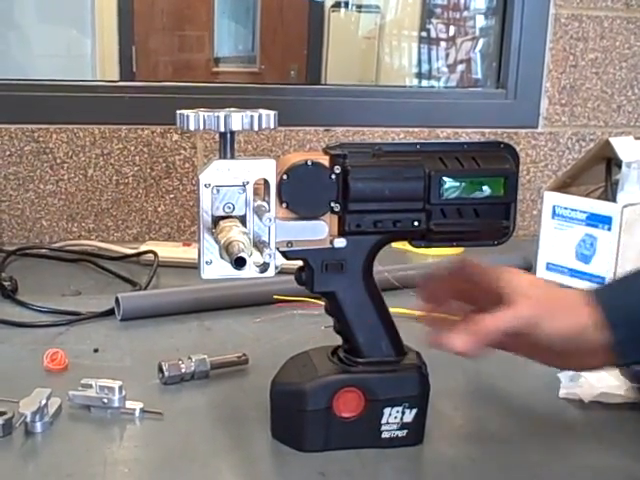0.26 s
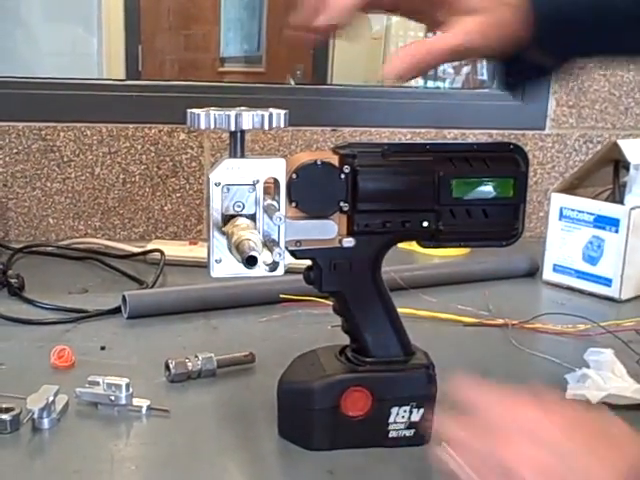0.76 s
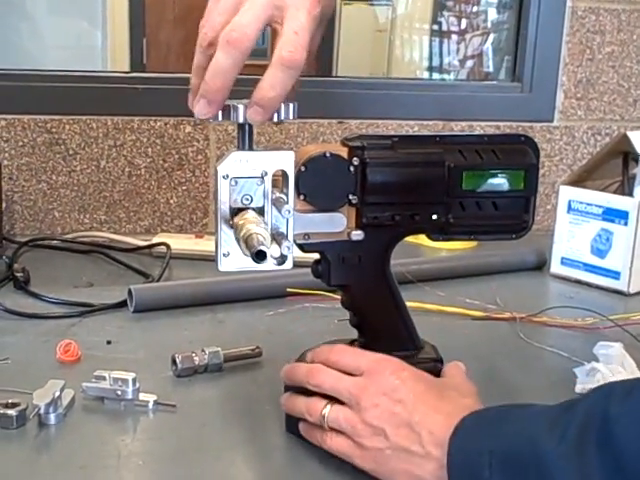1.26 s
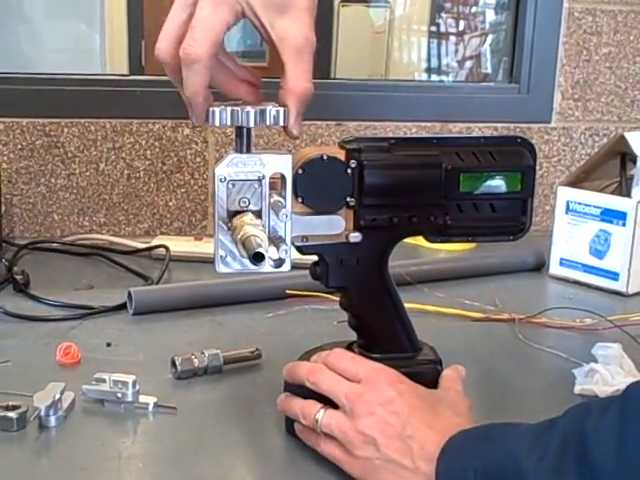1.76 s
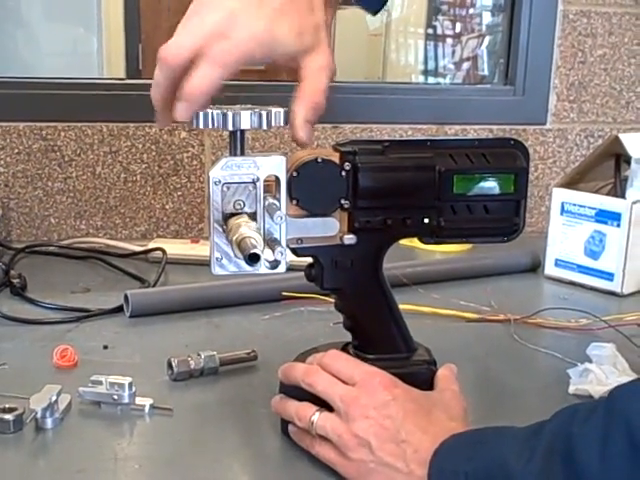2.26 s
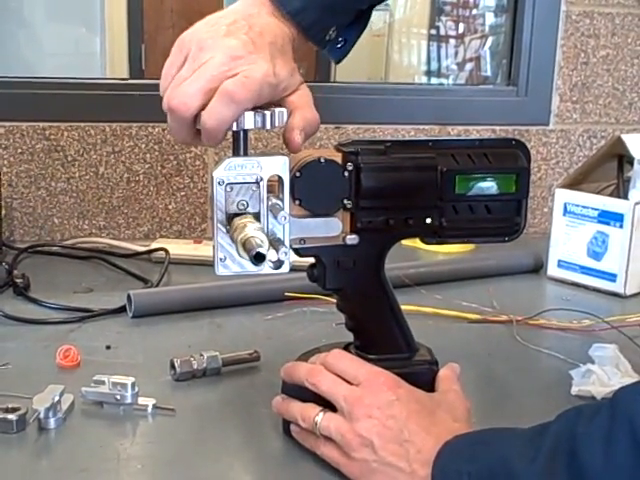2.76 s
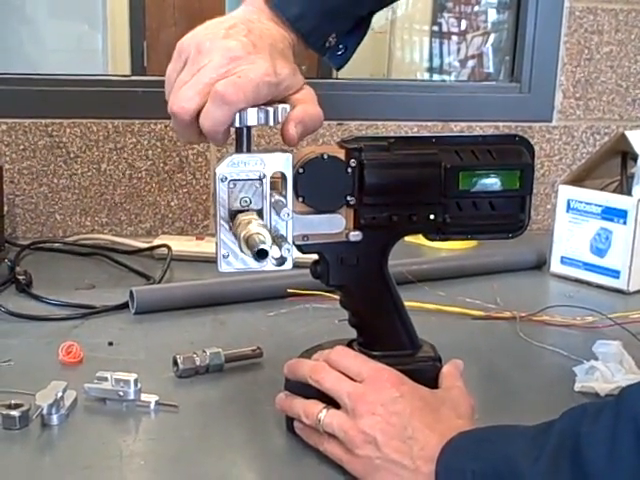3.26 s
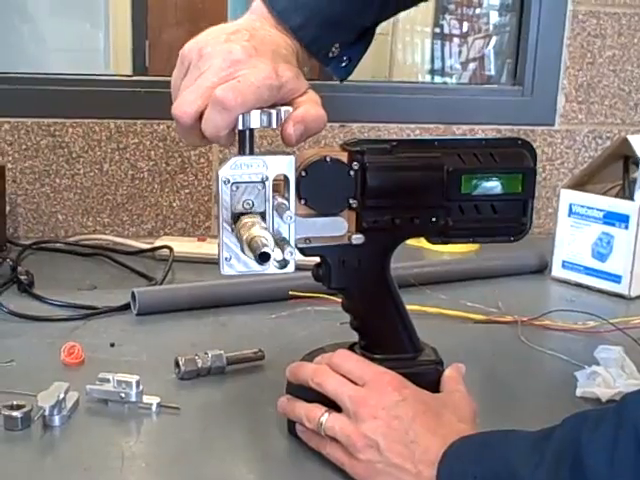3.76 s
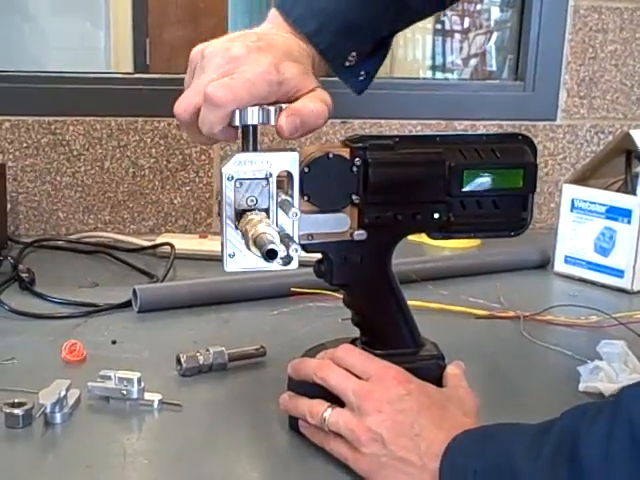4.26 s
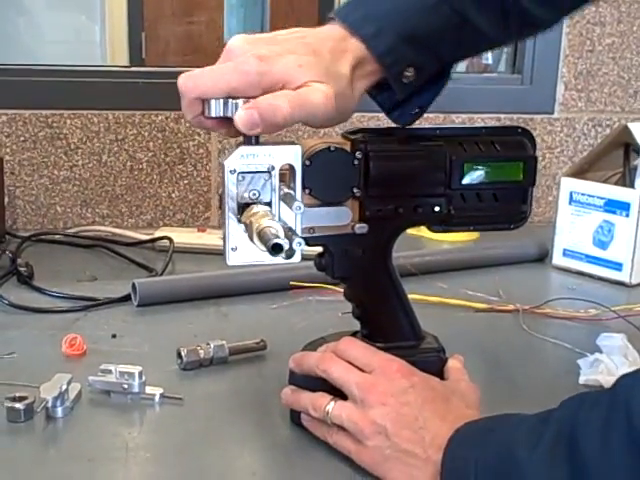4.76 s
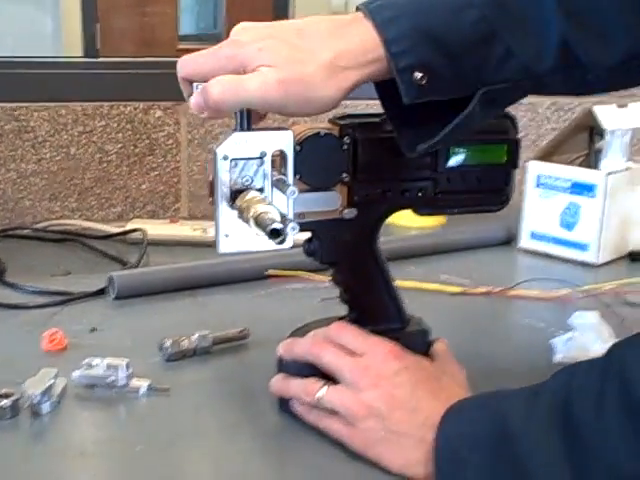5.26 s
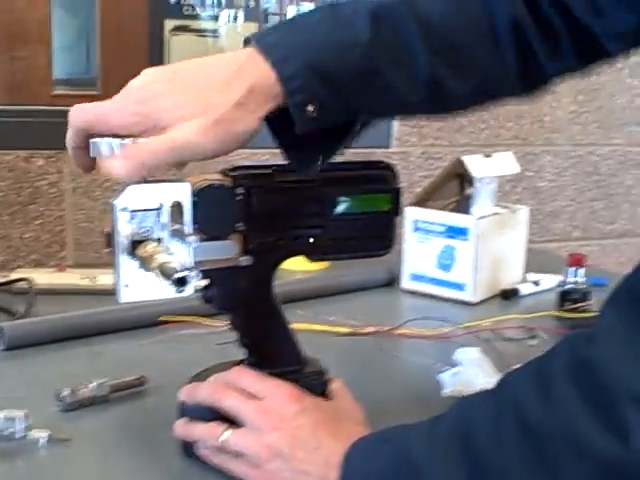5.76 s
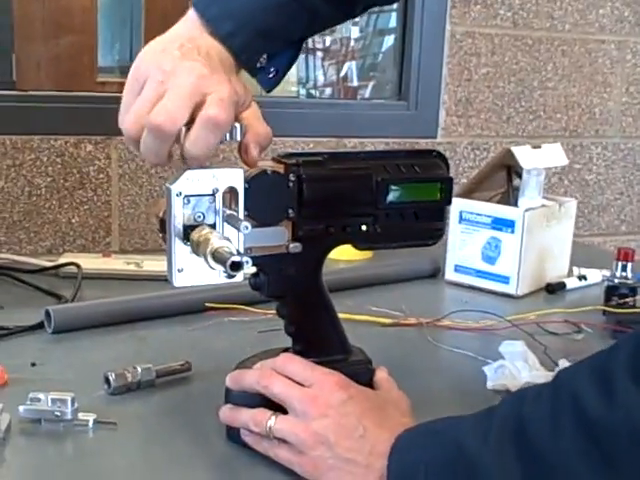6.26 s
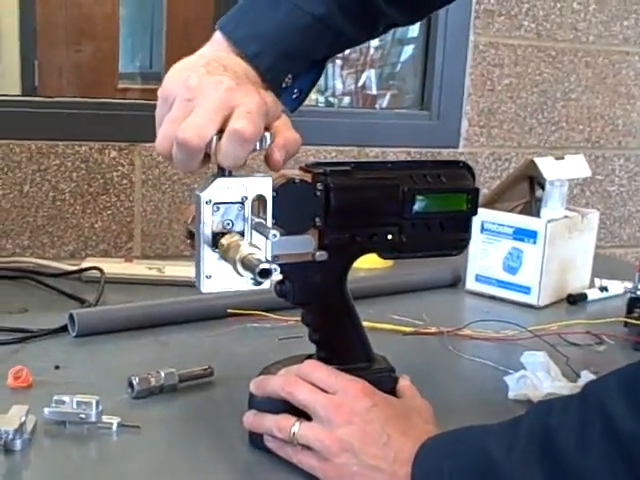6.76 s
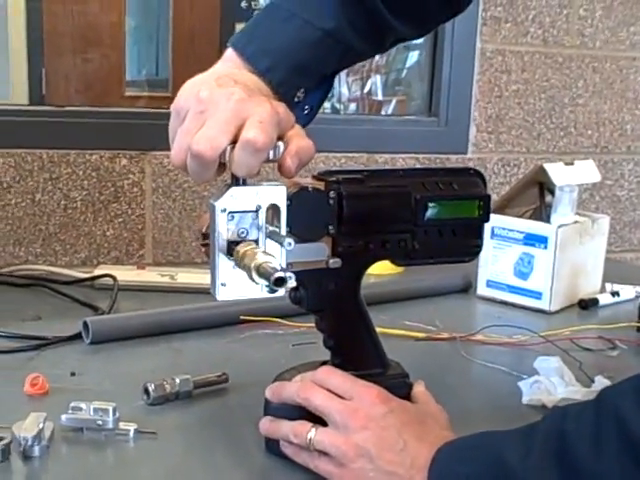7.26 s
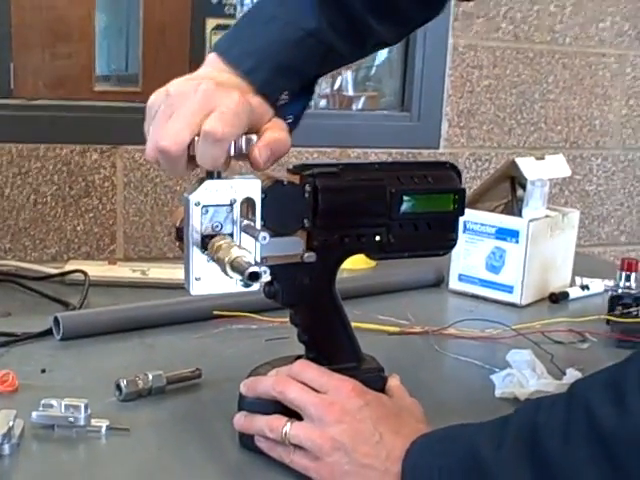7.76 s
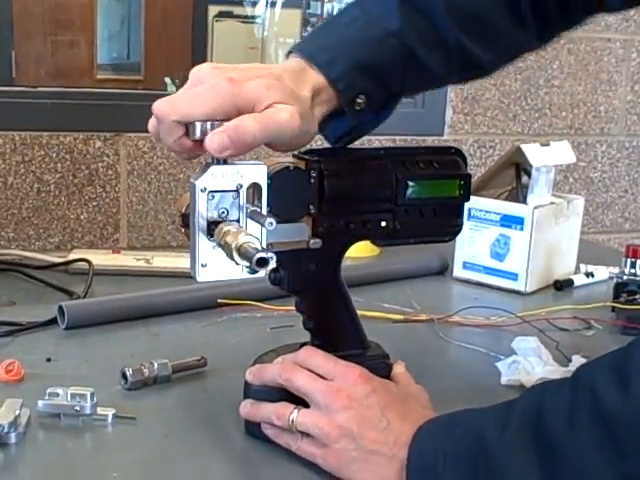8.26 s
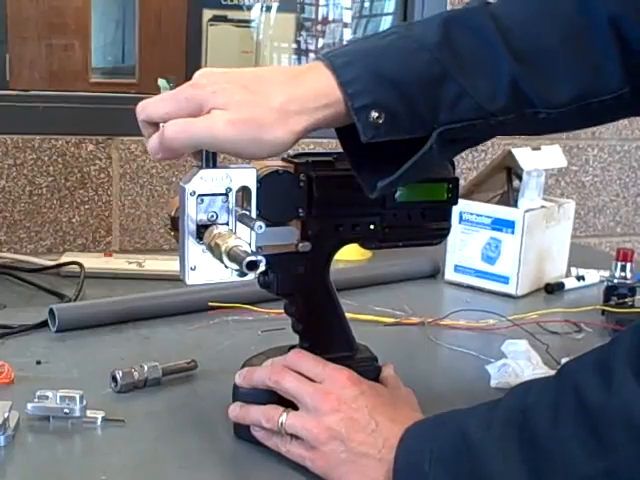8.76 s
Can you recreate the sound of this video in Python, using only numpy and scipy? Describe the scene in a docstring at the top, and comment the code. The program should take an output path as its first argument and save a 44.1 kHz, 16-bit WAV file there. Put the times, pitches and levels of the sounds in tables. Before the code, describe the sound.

A battery-driven tool on a bench, heard close with a short room tail. Its motor sweeps upward beneath a constant, wavering high squeal, then settles in just over a second into a dense, hissy, gear-laden whir. The shrill whine swells and dips. As the cutter is fed in, pitch drops a touch and a fuller hum emerges, continuing to the end.

```python
"""A battery tube cutter soft-starts on a workbench, then runs on while a hand feeds the cutter in.
Its controller sings at the switching rate until fully on. Sines locked to one shaft make the hum, brush tone
and pinion whine; noise makes the gear rattle through housing resonances, the fan rush, a hiss beside the
whine and a rumble on the bench during run-up. Workshop rumble and ventilation hum lie beneath."""
import sys
import numpy as np
from scipy import signal
from scipy.fft import rfft, irfft, next_fast_len
from scipy.io import wavfile
from scipy.ndimage import uniform_filter1d

SR = 44100
rng = np.random.default_rng(int(sys.argv[2]) if len(sys.argv) > 2 else 0)


def store_wav(level_fs):
    """Save 16-bit WAV to argv[1]."""
    pcm = np.round(np.clip(np.atleast_2d(level_fs), -1, 1) * 32767)
    wavfile.write(sys.argv[1], SR, pcm.T.astype(np.int16))


N = 396459
TIME_S = np.arange(N) / SR

# Switching-tone waver as the hand moves away from the grip: t/s, level/dB
SWITCH_WAVER_DB = [(.09, 2), (.195, -2), (.27, 1), (.38, -1), (.43, -5.5), (.49, -2), (.62, 0), (.748, -.5),
                   (.76, -13), (.83, -0.5)]
# Load as the hand feeds the cutter in: t/s, load/0-1
LOAD = [(1.3, 0), (1.7, .1), (2.2, .16), (3.9, .355), (4.35, .38), (5.3, .72), (6.3, .71), (7.9, .74),
        (8.45, .84), (8.99, 1)]
# Part levels: free-running level/dB, growth/dB per dB of speed, full-load change/dB, bite change/dB
HUM_LAW = (-42, 1.8, -3, 8.4)
BRUSH_LAW = (-38.7, 2.85, -1.5, -3.1)
SIDE_LAW = (-37, 1.2, 0, 1.5)
THRUM_LAW = (-64.5, .5, 13, 3.5)
RATTLE_LAW = (-25.5, 0.93, 0.43, .5)
AIR_LAW = (-28, 1.5, -.5, 0.8)
# Body resonances swept by the tones: f/Hz, width/Hz, lift/dB
BODY = [(232, 23, 8.5), (415.4, 5.9, 3.5), (870, 95, 19.5), (1600, 110, 16), (5320, 440, 11)]
# Pinion whine, before its speed law: t/s, level/dB
WHINE_DB = [(.55, -29.5), (.62, -25.5), (.69, -33), (.8, -24), (.96, -29.5), (1.04, -23), (1.15, -25.5),
            (1.26, -36), (1.37, -26.5), (1.85, -24), (2.27, -28.5), (2.74, -26.5), (3.4, -31.5),
            (4.06, -24), (4.4, -30.6), (5.0, -26.5), (5.05, -38), (5.1, -30.5), (5.25, -25), (5.48, -22),
            (6.05, -25.5), (6.33, -23), (7.36, -24), (8.15, -24.5), (8.29, -30.5), (8.44, -30), (8.51, -44),
            (8.6, -25.5), (8.8, -31)]
# Octave of the whine, before its speed law: t/s, level/dB
WHINE_OCTAVE_DB = [(1.6, -44.5), (2.1, -50), (3.1, -38), (4.1, -37.5), (5.2, -51), (6.15, -39), (6.6, -50),
                   (7.4, -37), (8.4, -39.5), (8.9, -52)]
# Weaker motor tones at free speed: order/multiple of shaft rate, level/dB
MOTOR_ORDERS = [(2, -52), (3, -47.5), (9, -45), (13, -48), (16, -43.5), (18, -46), (19, -61), (20, -52),
                (21, -40), (22, -46.5), (27, -63), (28, -45), (31, -54), (35, -51)]
# Second-gear tones at free speed: order/multiple of wheel rate, level/dB
WHEEL_ORDERS = [(22, -47), (44, -56), (66, -47)]
# Rattle swell, added to its law: t/s, level/dB
RATTLE_SWELL_DB = [(1.1, .6), (1.3, -.4), (2.5, -0.2), (3.3, 0.6), (5.12, -0.3), (5.4, 0.1), (8.62, -0.1),
                   (8.78, 0.3), (8.95, -1)]
# Housing resonances, relative: f/Hz, nominal width/Hz, level/dB
HOUSING = [(2330, 205, 2.5), (2630, 430, 4), (3315, 270, 2.5), (3890, 380, 4.5), (4385, 300, 8),
           (4576, 266, 13.5), (4775, 327, 13), (5030, 160, -1), (9040, 540, 5), (9390, 260, -2.5),
           (13600, 560, -10), (14700, 900, -2)]
# Direct tooth-click spectrum, relative: f/Hz, level/dB
TOOTH_CLICK = [(2000, -33), (2250, 0), (4000, 5.5), (6000, 1), (7500, -2.5), (9600, 0), (10800, -3.5),
               (13000, -3), (16000, -1)]
# Fan-air spectral shape: f/Hz, level/dB
FAN = [(60, -25), (200, -8.5), (320, -13), (450, -9), (540, -4), (720, -0.5), (880, -0.5), (980, 1),
       (1100, -3.5), (1210, 1.5), (1400, -2.5), (2000, -1.5), (4000, -1), (15000, -17.5)]
# Workshop-rumble spectral shape: f/Hz, level/dB
SHOP = [(20, -3.5), (50, -1.5), (90, -5.5), (150, -5), (300, -8), (1000, -11), (4000, -18), (15000, -35)]
# Ventilation hum: f/Hz, level/dB
SHOP_HUM = [(113, -60), (341, -58)]

PINION_TEETH, WHEEL_TEETH, COMMUTATOR_BARS = 15, 35, 7
# Soft start: initial speed, initial slope, easing; fully on, then settling time constant
START_HZ, SPIN_UP_HZ_PER_S, EASE_HZ_PER_S2, FULL_ON_S, SETTLE_S = 72, 390.9, 60.6, 1.019, .103
FREE_HZ, SAG_HZ = 428.2, 12.4  # turns per second: unloaded speed, loss at full load
BITE_S, BITE_SPREAD_S = 5.42, .3  # cutter enters the tube
SWITCH_HZ, SWITCH_DB, START_DUTY = 4998.6, -17.5, 0.24  # level at half duty, before waver
# Growth in dB per dB of speed; onset of tooth singing in shaft turns per second
WHINE_GROWTH, OCTAVE_GROWTH, SING_HZ, SING_RANGE_HZ = 1.5, 5, 208, 11
# Below this shaft speed, modes under the knee gain this many dB per octave
SOFT_BELOW_HZ, SOFT_RANGE_HZ, SOFT_TILT_DB, SOFT_KNEE_HZ = 350, 30, 6.5, 3800
TOP_HZ = 15750


def undb(db):
    """Decibels to amplitude gain."""
    return 10 ** (np.asarray(db) / 20)


def unit(x):
    """Scale to standard deviation 1."""
    return x / np.std(x)


def level(rows):
    """Straight-line interpolation of (t/s, value) rows."""
    return np.interp(TIME_S, *np.transpose(rows))


def step(x, middle, spread):
    """Smooth 0-1 step through the middle."""
    return (1 + np.tanh((x - middle) / spread)) / 2


def walk(rate_hz):
    """Random levels at rate_hz, smoothed by two moving averages; spread near 1."""
    hold = int(SR / rate_hz)
    held = np.repeat(rng.standard_normal(N // hold + 1), hold)
    slewed = uniform_filter1d(uniform_filter1d(held, hold), hold)
    return 1.184 * slewed[:N]


def colour(x, points):
    """Filter by (f/Hz, level/dB) points, interpolated over log frequency."""
    size = next_fast_len(N)
    hz, db = np.transpose(points)
    bins_hz = np.maximum(np.arange(size // 2 + 1) * SR / size, 1)
    gain = undb(np.interp(np.log(bins_hz), np.log(hz), db))
    return irfft(rfft(x, size) * gain, size)[:N]


def resonate(x, hz, width_hz):
    """Two cascaded resonators: steep skirts, gain 1 at the centre."""
    b, a = signal.iirpeak(hz, hz / width_hz / np.sqrt(2), fs=SR)
    return signal.lfilter(b, a, signal.lfilter(b, a, x))


def tone(turns, order, db, drift_db, flutter_db):
    """Sine at a multiple of a rotation; its rms level drifts and flutters."""
    wobble_db = drift_db * walk(1.73) + flutter_db * walk(30)
    phase = 2 * np.pi * (order * turns + rng.random())
    return np.sqrt(2) * undb(db + wobble_db) * np.sin(phase)


def shaft_speed(load):
    """Turns per second: eased soft start, exponential settling to free speed, sag with load."""
    ramp_s = np.minimum(TIME_S, FULL_ON_S)
    ramp_hz = START_HZ + SPIN_UP_HZ_PER_S * ramp_s - EASE_HZ_PER_S2 * ramp_s ** 2
    settling = np.exp(-(TIME_S - ramp_s) / SETTLE_S)
    return FREE_HZ - (FREE_HZ - ramp_hz) * settling - SAG_HZ * load


def speed_db(speed_hz):
    """Shaft speed in dB re free speed."""
    return 20 * np.log10(speed_hz / FREE_HZ)


def follow(law, speed_hz, load, bite):
    """Part level in dB from speed, load and bite."""
    free_db, growth, load_db, bite_db = law
    return free_db + growth * speed_db(speed_hz) + load_db * load + bite_db * bite


def body_db(hz):
    """Lift of a tone near the body's resonances."""
    return sum(db * np.exp(-((hz - centre_hz) / width_hz) ** 2) for centre_hz, width_hz, db in BODY)


def mesh_db(speed_hz, slow_db, stutter_db):
    """Tooth mesh: nearly mute when slow, grows with speed, stutters during run-up."""
    singing = step(speed_hz, SING_HZ, SING_RANGE_HZ)
    run_up = 1 - step(TIME_S, FULL_ON_S, SETTLE_S)
    stutter = stutter_db * walk(26.4) * run_up
    return WHINE_GROWTH * speed_db(speed_hz) + slow_db * (1 - singing) + stutter


def workshop():
    """Ventilation: coloured-noise rumble plus fixed hum tones."""
    hum = sum(tone(TIME_S, hz, db, drift_db=2.3, flutter_db=3.5) for hz, db in SHOP_HUM)
    rumble = unit(colour(rng.standard_normal(N), SHOP))
    return undb(-46.5) * rumble + hum


def controller(turns, sideband_db, octave_db):
    """Chopped current sings in the windings, most at half duty; commutator bars add a rising side tone."""
    duty = np.interp(TIME_S, [0, FULL_ON_S], [START_DUTY, 1])
    strength = np.sin(np.pi * duty) * undb(SWITCH_DB + level(SWITCH_WAVER_DB))
    phase = 2 * np.pi * SWITCH_HZ * TIME_S
    side_phase = phase + 2 * np.pi * COMMUTATOR_BARS * turns
    side = undb(sideband_db) * np.exp(-TIME_S / 0.16) * np.sin(side_phase)
    octave = undb(octave_db) * np.sin(2 * phase)
    return np.sqrt(2) * strength * (np.sin(phase) + side + octave)


def motor(turns, speed_hz, load, bite, contact_db, whine_db, octave_db):
    """Unbalance hums once a turn; commutator and pinion teeth whine at higher multiples."""
    wheel_turns = turns * PINION_TEETH / WHEEL_TEETH

    def part_db(law, order):
        """Law level plus body lift at this order."""
        return follow(law, speed_hz, load, bite) + body_db(order * speed_hz)

    # hum's body lift is read 1 % below its pitch
    out = tone(turns, 1, part_db(HUM_LAW, 0.99), drift_db=0.0, flutter_db=0.67)
    brush_db = part_db(BRUSH_LAW, COMMUTATOR_BARS)
    out += tone(turns, COMMUTATOR_BARS, brush_db, drift_db=1.5, flutter_db=1.5)
    out += tone(turns, PINION_TEETH, whine_db, drift_db=0.25, flutter_db=0.7)
    out += tone(turns, 2 * PINION_TEETH, octave_db, drift_db=3, flutter_db=0.5)
    # off-centre pinion: side tone one order lower
    side_order = PINION_TEETH - 1
    side_db = part_db(SIDE_LAW, side_order) + contact_db
    out += tone(turns, side_order, side_db, drift_db=0.1, flutter_db=1.7)
    # slower second gear thrums once a turn
    thrum_db = follow(THRUM_LAW, speed_hz, load, bite)
    out += tone(wheel_turns, 1, thrum_db, drift_db=1, flutter_db=0.7)
    # weaker tones emerge near full speed
    rise_db = 7 * speed_db(speed_hz)
    for shaft_turns, orders in ((turns, MOTOR_ORDERS), (wheel_turns, WHEEL_ORDERS)):
        for order, db in orders:
            out += tone(shaft_turns, round(order), db + rise_db, drift_db=2, flutter_db=2.3)
    return out


def gears(turns, speed_hz, rattle_db, scatter_db, throb, flicker_db, drift_db, surge_db):
    """Loose teeth knock unevenly, harder on one side of each turn, and ring the housing."""
    force = undb(scatter_db * walk(900)) * (1 + throb * np.cos(2 * np.pi * turns))
    knocks, clicks = force * rng.standard_normal((2, N))
    soft = 1 - step(speed_hz, SOFT_BELOW_HZ, SOFT_RANGE_HZ)
    ring = 0
    # wandering contact point: each resonance takes a changing share
    for hz, width_hz, db in HOUSING:
        soft_db = soft * SOFT_TILT_DB * max(np.log2(SOFT_KNEE_HZ / hz), 0)
        share_db = flicker_db * walk(45) + drift_db * walk(3.34)
        ring += undb(db + soft_db + share_db) * resonate(knocks, hz, width_hz)
    return undb(rattle_db + surge_db * walk(25)) * (ring + colour(clicks, TOOTH_CLICK))


def fan(air_db, flutter_db):
    """Cooling air through the vents: coloured noise."""
    air = unit(colour(rng.standard_normal(N), FAN))
    return air * undb(air_db + flutter_db * walk(25))


def surroundings(x, arm_db, room_db, t60_s):
    """Echo off the moving arm ripples the spectrum; the workshop adds a short tail."""
    lag_s = .0017 + 0.0002 * walk(0.684)
    arm = np.interp(TIME_S - lag_s, TIME_S, x)
    age_s = TIME_S[:SR // 2]
    tail = rng.standard_normal(len(age_s)) * undb(-60 * age_s / t60_s) * (age_s > .003)
    room = signal.fftconvolve(x, tail / np.linalg.norm(tail))[:N]
    arm_gain, room_gain = undb(arm_db), undb(room_db)
    mix = x + arm_gain * arm + room_gain * room
    return mix / np.sqrt(1 + arm_gain ** 2 + room_gain ** 2)


def shudder(speed_hz, rocking_hz, width_hz, db):
    """Bench rumble at the rocking resonance, strongest as shaft speed passes 1.27 times its frequency."""
    nearness = np.exp(-((speed_hz - 1.27 * rocking_hz) / width_hz) ** 2)
    rumble = unit(resonate(rng.standard_normal(N), rocking_hz, width_hz))
    return rumble * undb(db) * nearness


def rasp(whine_db, hz, width_hz, db):
    """Sliding teeth: fixed narrow hiss just under the full-speed whine, following the whine's level."""
    hiss = unit(resonate(rng.standard_normal(N), hz, width_hz))
    return hiss * undb(whine_db + db)


def scene():
    """One shaft and its load drive the tool; both channels are identical."""
    load, bite = level(LOAD), step(TIME_S, BITE_S, BITE_SPREAD_S)
    speed_hz = shaft_speed(load)
    turns = np.cumsum(speed_hz * (1 + 0.00031 * walk(40))) / SR
    contact_db = mesh_db(speed_hz, slow_db=-15, stutter_db=4.0)
    whine_db = level(WHINE_DB) + contact_db
    octave_db = level(WHINE_OCTAVE_DB) + OCTAVE_GROWTH * speed_db(speed_hz)
    tones = controller(turns, sideband_db=-23, octave_db=-30)
    tones += motor(turns, speed_hz, load, bite, contact_db, whine_db, octave_db)
    rattle_db = follow(RATTLE_LAW, speed_hz, load, bite) + level(RATTLE_SWELL_DB)
    rush = gears(turns, speed_hz, rattle_db, scatter_db=1.2, throb=0.36,
                 flicker_db=1.0, drift_db=.25, surge_db=0.36)
    rush += fan(follow(AIR_LAW, speed_hz, load, bite), flutter_db=0.08)
    rush += rasp(whine_db, hz=6180, width_hz=180, db=-18.5)
    bench = shudder(speed_hz, rocking_hz=185, width_hz=57, db=-48)
    # only the noisy parts get echo and tail
    air = surroundings(rush, arm_db=-14.0, room_db=-10.5, t60_s=0.2)
    mono = tones + air + bench + workshop()
    return np.array([mono, mono])


def record(dry):
    """Recorder's steep elliptic low-pass."""
    lowpass = signal.ellip(12, .1, 80, TOP_HZ, fs=SR, output="sos")
    return signal.sosfilt(lowpass, dry)


dry = scene()
out = record(dry)
store_wav(out)
```